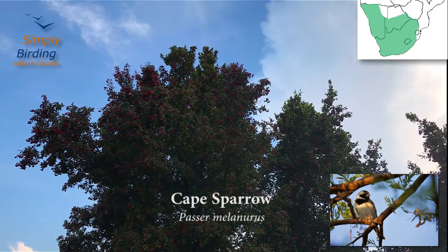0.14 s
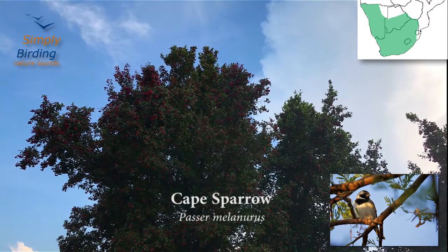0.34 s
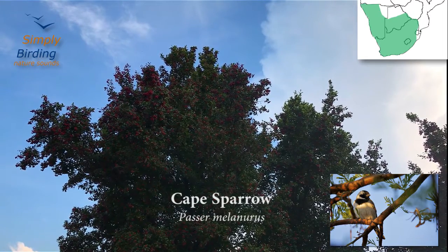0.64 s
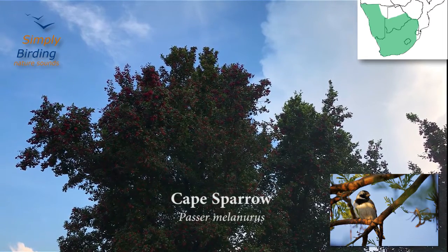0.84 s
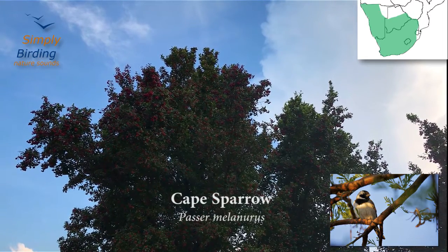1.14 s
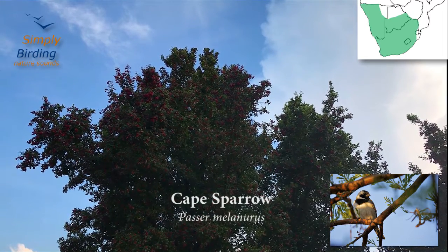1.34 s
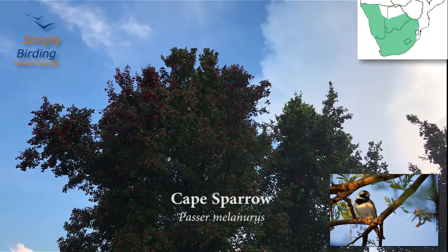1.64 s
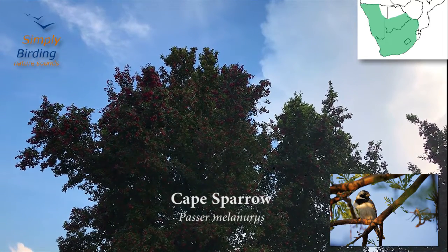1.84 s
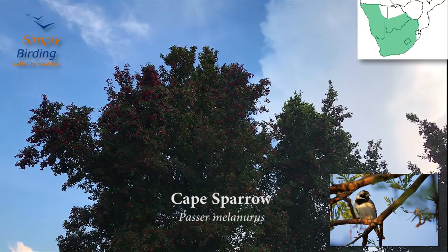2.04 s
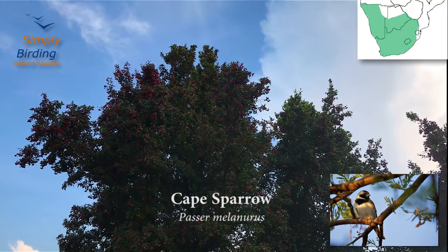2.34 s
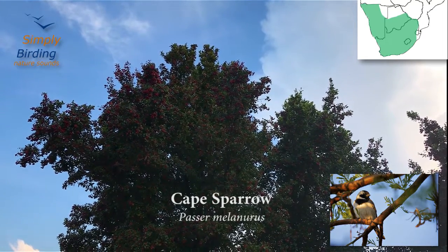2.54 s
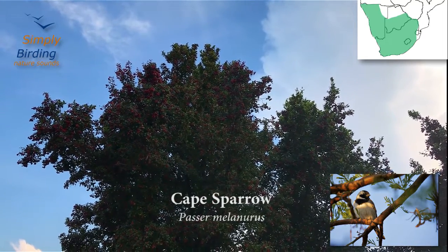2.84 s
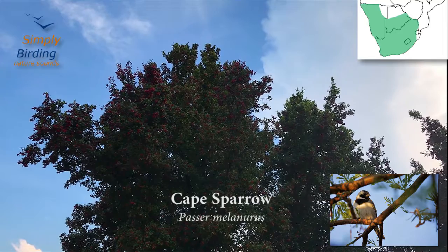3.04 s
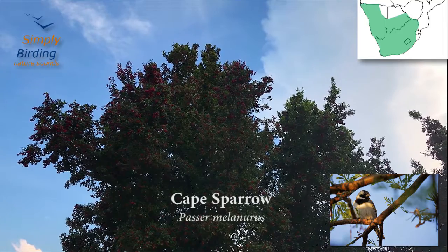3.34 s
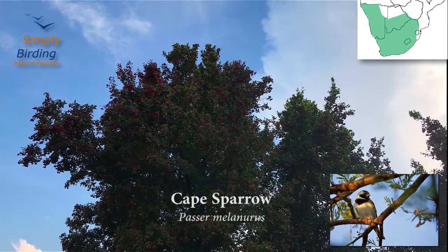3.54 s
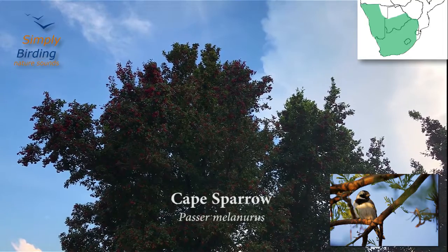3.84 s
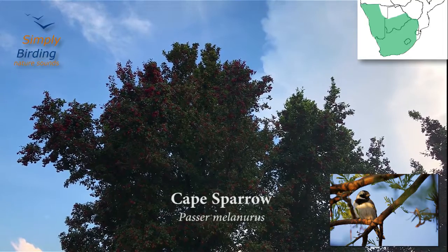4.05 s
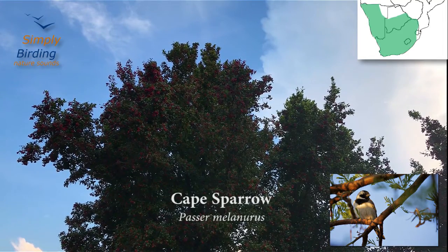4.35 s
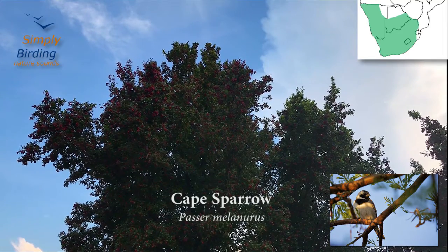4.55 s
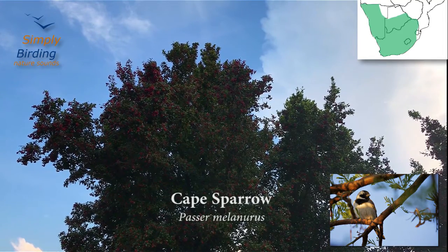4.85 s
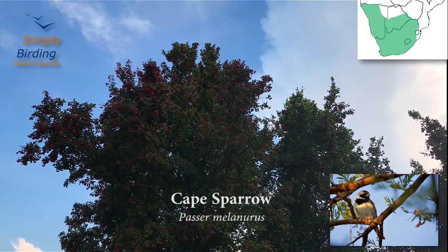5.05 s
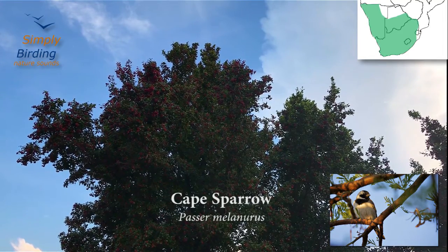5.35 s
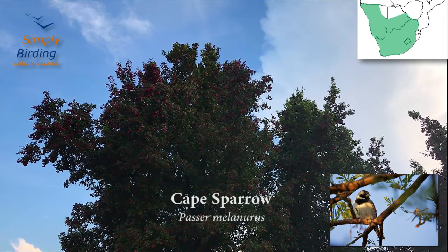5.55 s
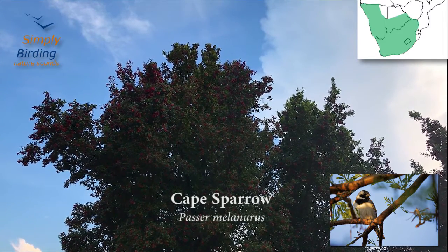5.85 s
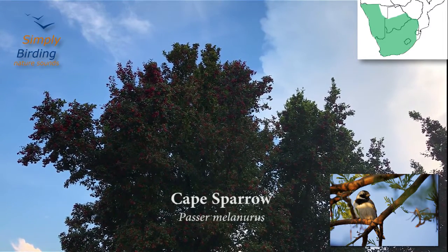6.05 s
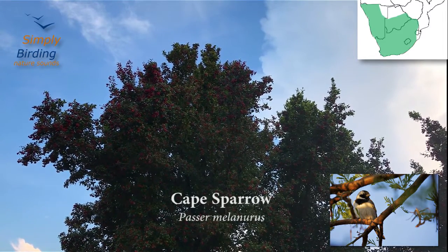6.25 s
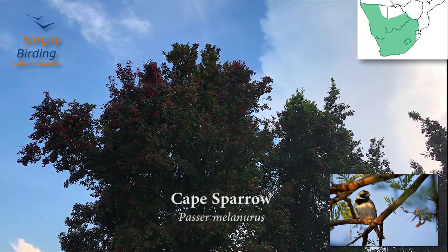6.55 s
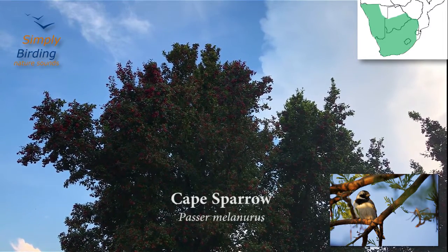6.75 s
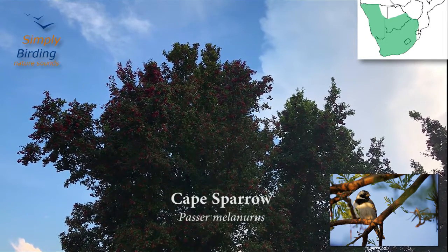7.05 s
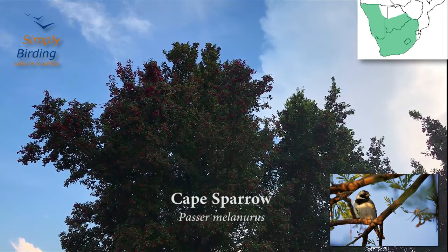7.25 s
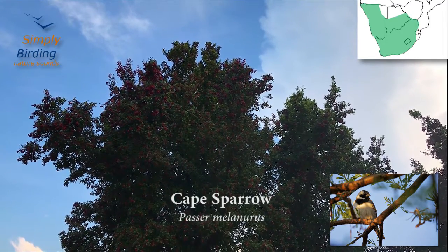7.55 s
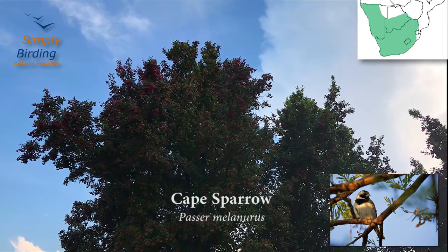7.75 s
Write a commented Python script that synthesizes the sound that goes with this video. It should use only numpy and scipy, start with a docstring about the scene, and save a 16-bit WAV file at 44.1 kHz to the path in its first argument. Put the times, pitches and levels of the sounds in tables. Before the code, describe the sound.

Sharp, high sparrow chirps repeat at an even pace in a garden, with other birds whistling faintly behind.

```python
"""In a garden, a sparrow in a tree alternates two chirps: a two-voiced warble and a falling slide.
Airflow vibrates a membrane on each side of its syrinx, and a throat resonance shapes the loudness.
Farther birds whistle, a dove coos, a neighbour chips and a young bird cheeps, their tones blurred by
scattering in foliage. Leaves and walls return a short echo over a faint hiss of leaves and far traffic."""
import sys
import numpy as np
from scipy import signal
from scipy.fft import rfft, irfft
from scipy.io import wavfile
from scipy.ndimage import uniform_filter1d

SR = 44100
rng = np.random.default_rng(int(sys.argv[2]) if len(sys.argv) > 2 else 0)


def store_pcm(level_fs):
    """Save levels as 16-bit WAV."""
    pcm = np.round(np.clip(level_fs, -1, 1) * 32767).astype(np.int16)
    wavfile.write(sys.argv[1], SR, np.atleast_2d(pcm).T)


N = 348390

# Spectral density of the hiss: frequency_hz, relative_db
HISS_SPECTRUM = [(20, -16.5), (70, -39), (200, -35.5), (400, -26.5), (640, -18.5), (1070, -10),
                 (1570, -4.5), (2060, -2.5), (2630, -7), (3370, -6.5), (4300, -12), (5200, -16.5),
                 (6100, -13), (7200, -18), (11000, -19.5), (15700, -22)]
# Far whistles: start_s, length_s, start_hz, middle_hz, end_hz, level_db, blur_hz
WHISTLES = [(.0, 0.056, 2370, 2430, 2300, -62, 40), (.0, 0.073, 3600, 3330, 3300, -60, 845),
            (0.244, 0.078, 2990, 3093, 3100, -62.5, 30.5), (0.245, 0.06, 2180, 1994, 1720, -56, 81),
            (.4, 0.098, 3280, 3405, 3540, -63, 29.9), (1, 0.094, 7300, 7260, 7180, -66.5, 31.85),
            (1.324, 0.061, 3490, 3930, 4430, -62, 1079), (1.367, 0.12, 2200, 2356, 2660, -63.5, 29.5),
            (1.451, 0.17, 2560, 2615, 2510, -55, 45), (1.671, 0.12, 1900, 2182, 2123, -54, 39.8),
            (1.77, 0.055, 2070, 1859, 1925, -54.5, 29.36), (1.735, .06, 3880, 3580, 3124, -63.5, 81.03),
            (1.78, .55, 1251, 1190, 1049, -73.5, 50.05), (2.21, 0.075, 2780, 3326, 3086, -49, 110),
            (2.415, 0.15, 1800, 2200, 2184, -55, 45.1), (2.62, 0.44, 2200, 2106, 2058, -68, 28.04),
            (2.645, 0.17, 3830, 5240, 5680, -70, 59.8), (2.727, .15, 3200, 3420, 3520, -67, 39.94),
            (3.102, 0.57, 2100, 2052, 2080, -66, 23), (3.296, 0.23, 2420, 2410, 2300, -62, 38),
            (3.63, 0.046, 4230, 4210, 3620, -57.5, 350), (4.035, 0.19, 5840, 5870, 5800, -64, 605),
            (4.048, 0.2, 5390, 5100, 5020, -65, 161), (4.363, 0.096, 3410, 3474, 3240, -62.5, 299),
            (5.096, 0.022, 1910, 2340, 2970, -46.5, 200), (7.002, 0.073, 4000, 4460, 4610, -61.5, 740),
            (7.106, 0.14, 3390, 3330, 3460, -62.5, 350)]
# Echo decay, before each source's time factor: frequency_hz, base_t60_s
ECHO_DECAY = [(1500, 0.11), (2500, 0.37), (4000, 0.27), (6000, 0.58), (12000, 0.046)]
# Dove notes: start_s, length_s, pitch_hz, level_db
DOVE_COOS = [(.236, 0.1, 440, -84.5), (2.34, 0.13, 593, -79), (5.38, 0.11, 679, -76.5),
             (5.998, .45, 741, -73.5), (7.001, 0.16, 525, -82)]
# Sparrow chirps, tilted in level as the head turns: start_s, gain_db, pitch_ratio, length_ratio, tilt_db
WARBLE_CHIRPS = [(0.7457, -0.5, 1.002, 1.005, -2), (2.9858, 0.5, 1.008, 0.98, -0.5),
                 (5.1017, 0, 1.012, .99, -2.3), (7.2674, 0, 1.013, 1.009, -6.5)]
SLIDE_CHIRPS = [(1.8671, -0.044, 1.027, 0.96, 0), (3.8389, 0.25, 1.021, 0.98, 0.015),
                (5.9776, -0.49, 1.028, 0.95, 0.0017), (7.8514, 0.16, 1.025, 0.95, 0)]
# Membrane gestures, before each chirp's ratios: time_s, pitch_hz, effort_db
WARBLE_ARCH = [(-.005, 3158, -45.5), (.002, 4323, -15.5), (.007, 4590, -13.5), (.014, 4780, -18.5),
               (.028, 4880, -18), (.038, 4540, -15.5), (.044, 3888, -7), (.051, 3050, -30)]
WARBLE_UNDERTONE = [(.005, 3850, -48), (.014, 3602, -26.5), (0.035, 3350, -23), (.041, 3397, -23.5)]  # the other side of the syrinx
WARBLE_CATCH = [(.044, 4025, -44.5), (0.051, 4134, -16.5), (.058, 4300, -49.5)]
WARBLE_WAVE = [(.049, 2950, -32.5), (.057, 3237, -12.5), (.068, 3800, -15), (.085, 4117, -13.5),
               (0.108, 3620, -23.5), (.118, 2975, -12), (.135, 2193, -12), (0.145, 2434, -10),
               (.154, 2977, -20.5), (.165, 3070, -46)]
SLIDE_FLICK = [(-.007, 4810, -49.5), (.002, 4218, -17.5), (.006, 3214, -27.5), (.008, 2939, -45.5),
               (.0097, 4060, -14), (.014, 6414, -26.5), (.018, 4968, -14), (.022, 4893, -22.5)]
SLIDE_FALL = [(.019, 4950, -31), (0.027, 4877, -19), (0.032, 4716, -20.5), (.037, 4415, -10.5),
              (.055, 3768, -8.5), (.072, 3256, -9.5), (.081, 2990, -7.5), (.088, 2680, -10),
              (.1, 2268, -11), (.118, 1873, -18), (.127, 1780, -36)]
# Nonlinear terms (square, cube, fourth power, voices mixing): level_db
DISTORTION_DB = [-46, -49, -59, -36.5]
# Colour the beak gives the overtones: frequency_hz, gain_db
BEAK_RESPONSE = [(3300, -6), (4500, 12.5), (6000, 5.5), (7000, 1), (8400, 2.5), (9800, 1), (11500, 4),
                 (13000, -4.5), (15500, -5)]
# The neighbour's chips: start_s, level_db, pitch_ratio
NEIGHBOUR_CHIPS = [(1.375, -56, 0.93), (3.068, -42, 1), (3.63, -51.5, 1.01), (5.17, -46.5, 0.95)]
# The two voices of a chip: length_s, start_hz, middle_hz, end_hz, gain_db, blur_hz
NEIGHBOUR_VOICES = [(0.051, 5050, 5380, 4500, -6.5, 230), (.057, 4500, 4600, 3600, 0.5, 160)]
# The young bird's cheeps: start_s, length_s, start_hz, middle_hz, end_hz, level_db
YOUNG_CHEEPS = [(7.401, 0.055, 3290, 2926, 2890, -56.5), (7.498, 0.056, 2980, 2605, 2500, -58),
                (7.684, .07, 3100, 2657, 2410, -59.5)]
# Harmonics 1 to 6 of a cheep: gain_db
CHEEP_HARMONICS_DB = [-12, -3.5, -4.5, -13.5, -17, -21]

THROAT_HZ, THROAT_HALF_WIDTH_HZ = 3351, 433
HISS_DB, BAND_LIMIT_HZ = -60.5, 15720


def gain_of(db):
    """Amplitude ratio of a level in decibels."""
    return 10 ** (np.asarray(db) / 20)


def unit_rms(x):
    """Normalisation to unit power."""
    return x / np.sqrt(np.mean(abs(x) ** 2) + 1e-20)


def spectrum_at(table, hz):
    """Interpolation on a logarithmic frequency axis."""
    table_hz, value = np.transpose(table)
    return np.interp(np.log(hz + 1), np.log(table_hz + 1), value)


def add(mix, start_s, sound):
    """Superposition of a sound on the mix."""
    part = mix[max(round(start_s * SR), 0):][:len(sound)]
    part += sound[:len(part)]


def flutter(samples, width_hz):
    """Random modulation: complex noise in a Gaussian band around 0 Hz."""
    real, imag = rng.standard_normal((2, SR // 2))
    band = np.exp(-2 * (np.fft.fftfreq(SR // 2, 1 / SR) / width_hz) ** 2)
    return np.resize(unit_rms(np.fft.ifft((real + 1j * imag) * band)), samples)


def hiss():
    """Leaves, far traffic and faint chatter sum incoherently to noise with drifting spectral patches."""
    frames, hz = N // 256 + 5, np.fft.rfftfreq(1024, 1 / SR)
    real, imag, patches = rng.standard_normal((frames, 513, 3)).T
    patches = unit_rms(uniform_filter1d(uniform_filter1d(patches, 14, axis=0), 20, axis=1))
    song_band = np.exp(-np.log((hz + 1) / 3300) ** 2 / .5)[:, None]  # patchier where small birds sing
    level_db = spectrum_at(HISS_SPECTRUM, hz)[:, None] + (1.38 + 1.2 * song_band) * patches
    noise = signal.istft((real + 1j * imag) * gain_of(level_db), nperseg=1024, noverlap=768)[1]
    return gain_of(HISS_DB) * unit_rms(noise[:N])


def far_note(length_s, start_hz, middle_hz, end_hz, level_db, blur_hz, harmonics_db=(0,)):
    """Scattering in foliage randomises the amplitude and phase of a parabolic glide."""
    u = np.linspace(-1, 1, round(length_s * SR))
    hz = middle_hz + (end_hz - start_hz) / 2 * u + ((end_hz + start_hz) / 2 - middle_hz) * u ** 2
    cycles = np.cumsum(hz) / SR
    tone = sum(gain * np.exp(2j * np.pi * k * cycles) for k, gain in enumerate(gain_of(harmonics_db), 1))
    scattered = tone * (.23 + 1.3 * flutter(len(u), blur_hz))
    return gain_of(level_db) * scattered.real * signal.windows.tukey(len(u), .5)


def far_birds(chatter_count=9, low_hz=1910, high_hz=3700):
    """Whistles and faint random chatter, each a single tone broadened by scattering."""
    mix = np.zeros(N)
    for start_s, *note in WHISTLES:
        add(mix, start_s, far_note(*note))
    for when, height, slant, length in rng.random((chatter_count, 4)):
        hz = low_hz * (high_hz / low_hz) ** height
        bend_hz = .043 * (2 * slant - 1) * hz
        note = far_note(.076 * (.5 + length), hz - bend_hz, hz, hz + bend_hz, level_db=-68.5, blur_hz=150)
        add(mix, when * N / SR, note)
    return mix


def with_echo(direct, echo_db, gap_s, t60_ratio):
    """Reflections from leaves and walls: sparse taps of random sign, each band decaying exponentially."""
    taps = np.zeros(SR)
    slots = np.arange(round(gap_s * SR), SR - 20, 20)
    taps[slots + rng.integers(0, 20, len(slots))] = rng.choice([-1., 1.], len(slots))
    hz, t, spectra = signal.stft(taps, SR, nperseg=256)
    t60_s = t60_ratio * spectrum_at(ECHO_DECAY, hz)[:, None]
    tail = signal.istft(spectra * gain_of(-60 * t / t60_s), SR, nperseg=256)[1]
    return direct + gain_of(echo_db) * signal.fftconvolve(direct, tail / np.linalg.norm(tail))[:N]


def dove():
    """Each coo is a low fundamental gliding up to its pitch, blurred by scattering."""
    mix = np.zeros(N)
    for start_s, length_s, hz, level_db in DOVE_COOS:
        add(mix, start_s, far_note(length_s, .906 * hz, hz, hz, level_db, blur_hz=60))
    return mix


def pitch_curve(t, time_s, hz):
    """Cubic Hermite interpolation, levelling off at every turn of pitch."""
    span_s = np.diff(time_s)
    rate = np.diff(hz) / span_s
    product = rate[1:] * rate[:-1]
    slope = np.r_[rate[0], np.where(product > 0, 2 * product / (rate[1:] + rate[:-1] + 1e-9), 0), rate[-1]]
    k = np.clip(np.searchsorted(time_s, t) - 1, 0, len(span_s) - 1)
    u = np.clip((t - time_s[k]) / span_s[k], 0, 1)
    step = hz[k] + (hz[k + 1] - hz[k]) * u * u * (3 - 2 * u)
    return step + span_s[k] * u * (1 - u) * (slope[k] * (1 - u) - slope[k + 1] * u)


def membrane(gesture, t, pitch_ratio):
    """A vibrating membrane as a phasor, before and after the throat resonance weights it by pitch."""
    time_s, pitch_hz, effort_db = np.transpose(gesture)
    hz = uniform_filter1d(pitch_curve(t, time_s, pitch_hz), 30) * pitch_ratio
    level_db = np.interp(t, time_s, effort_db, left=-99, right=-99) + .5 * flutter(len(t), 250).real
    envelope = uniform_filter1d(uniform_filter1d(gain_of(level_db), 30), 30)
    source = np.sqrt(2) * envelope * np.exp(2j * np.pi * (np.cumsum(hz) / SR + rng.random()))
    return source, source / np.hypot(1, (hz - THROAT_HZ) / THROAT_HALF_WIDTH_HZ)


def chirp(gestures, lead_s, gain_db, pitch_ratio, length_ratio, tilt_db):
    """The voices superpose; uneven airflow adds unsteady overtones and combination tones."""
    t = (np.arange(0, .2, 1 / SR) - lead_s) / length_ratio
    sources, voices = zip(*[membrane(gesture, t, pitch_ratio) for gesture in gestures])
    tone = sum(voices)
    effort = np.linalg.norm(sources, axis=0)
    phasor = tone / np.linalg.norm(voices, axis=0)
    terms = [phasor ** 2, phasor ** 3, phasor ** 4, phasor * (abs(phasor) ** 2 - 1)]
    overtones = np.zeros(len(t))
    for gain, term in zip(gain_of(DISTORTION_DB), terms):
        waver, turbulence = flutter(len(t), width_hz=70), flutter(len(t), width_hz=2400)
        overtones += (gain * effort * term * (.62 + .67 * waver + .62 * turbulence)).real
    beak = gain_of(spectrum_at(BEAK_RESPONSE, np.fft.rfftfreq(len(t), 1 / SR)))
    overtones = irfft(rfft(overtones) * beak, len(t))
    return (tone.real + overtones) * gain_of(gain_db + tilt_db * np.linspace(-.5, .5, len(t)))


def sparrow(lead_s=.01):
    """Warbles and slides with their echo; a source small against the wavelength radiates no bass."""
    mix = np.zeros(N)
    warble = [WARBLE_ARCH, WARBLE_UNDERTONE, WARBLE_CATCH, WARBLE_WAVE]
    slide = [SLIDE_FLICK, SLIDE_FALL]
    for gestures, chirps in (warble, WARBLE_CHIRPS), (slide, SLIDE_CHIRPS):
        for start_s, *variation in chirps:
            add(mix, start_s - lead_s, chirp(gestures, lead_s, *variation))
    mix = with_echo(mix, echo_db=-21, gap_s=.0027, t60_ratio=1.466)
    return signal.sosfilt(signal.butter(4, 1100, "high", fs=SR, output="sos"), mix)


def neighbour():
    """Biphonation: two voices sound at once in each chip."""
    mix = np.zeros(N)
    for start_s, level_db, pitch_ratio in NEIGHBOUR_CHIPS:
        for length_s, *glide_hz, gain_db, blur_hz in NEIGHBOUR_VOICES:
            glide_hz = np.multiply(glide_hz, pitch_ratio)
            add(mix, start_s, far_note(length_s, *glide_hz, level_db + gain_db, blur_hz))
    return mix


def young_bird():
    """Falling cheeps rich in harmonics, with more reflected than direct sound."""
    mix = np.zeros(N)
    for start_s, *note in YOUNG_CHEEPS:
        add(mix, start_s, far_note(*note, blur_hz=340, harmonics_db=CHEEP_HARMONICS_DB))
    return with_echo(mix, echo_db=8.5, gap_s=.0017, t60_ratio=1.08)


def scene():
    """Sound pressures add linearly: hiss, far birds, sparrow and young bird in one channel."""
    far = with_echo(far_birds() + dove() + neighbour(), echo_db=-5.5, gap_s=.006, t60_ratio=1.3)
    return (hiss() + far + sparrow() + young_bird())[None]


def record(dry):
    """A linear-phase low-pass filter limits the bandwidth."""
    low_pass = signal.firwin(511, BAND_LIMIT_HZ, window=("kaiser", 9), fs=SR)
    return signal.oaconvolve(dry, low_pass[None], "same")


dry = scene()
out = record(dry)
store_pcm(out)
```